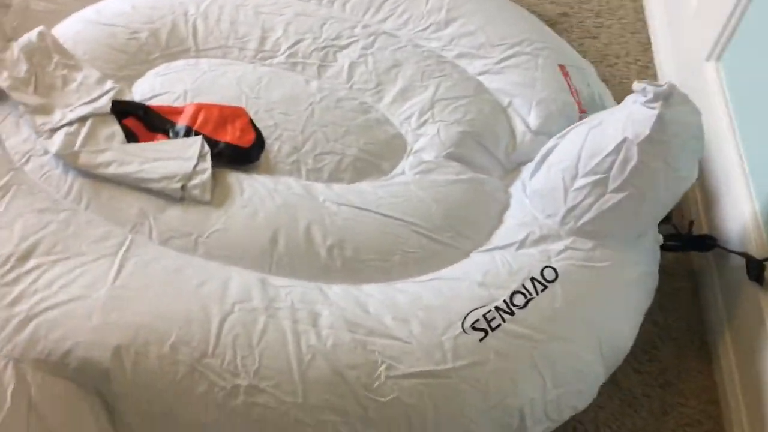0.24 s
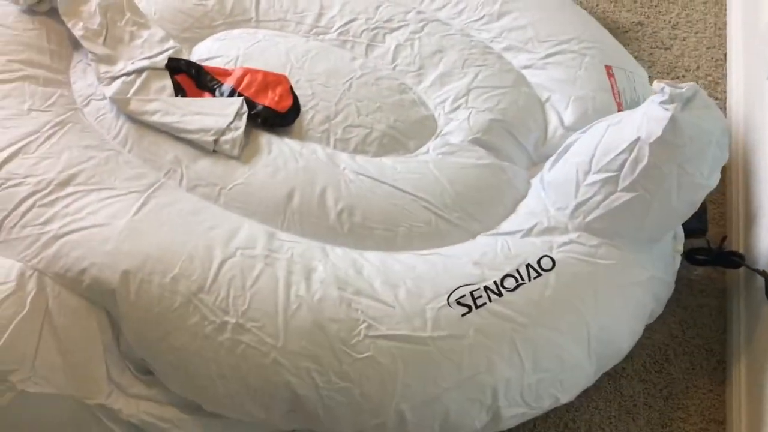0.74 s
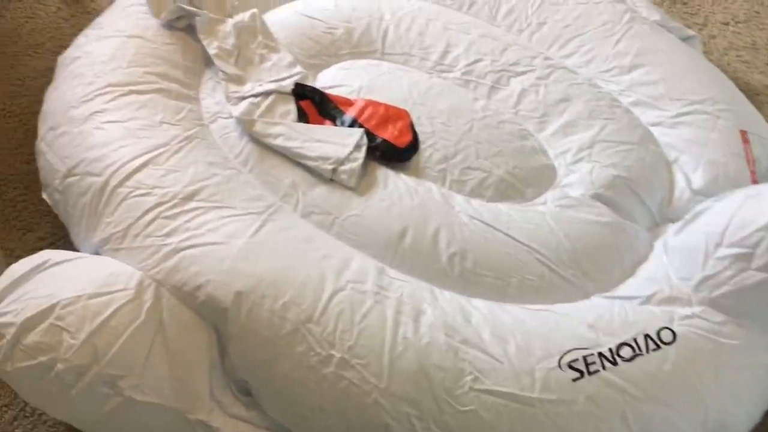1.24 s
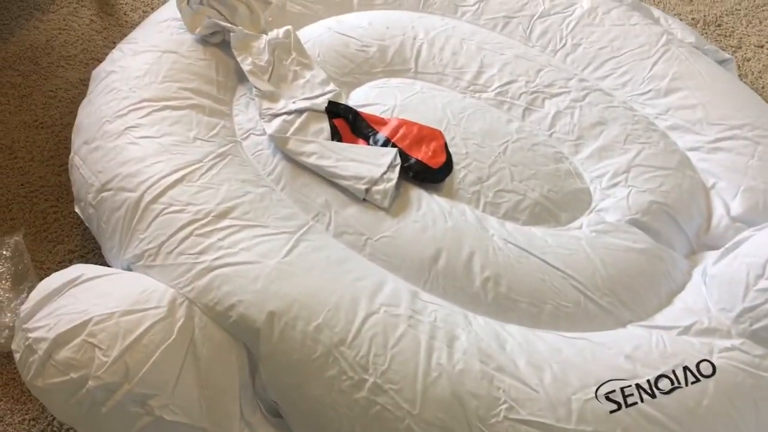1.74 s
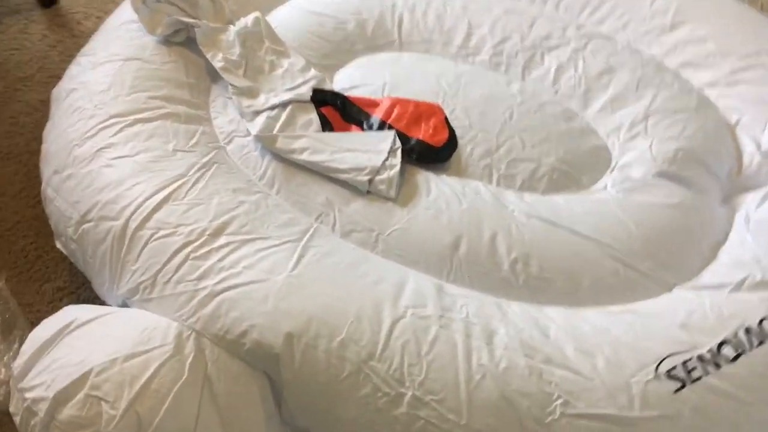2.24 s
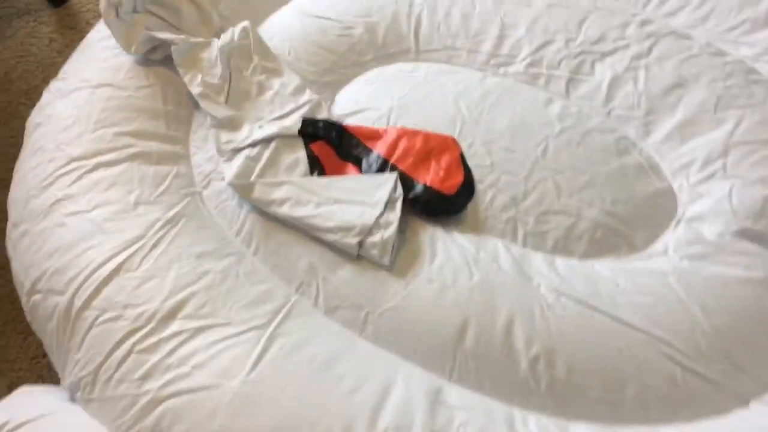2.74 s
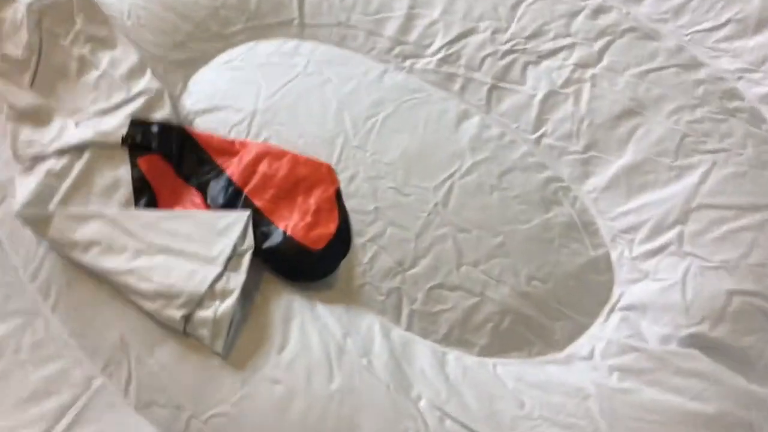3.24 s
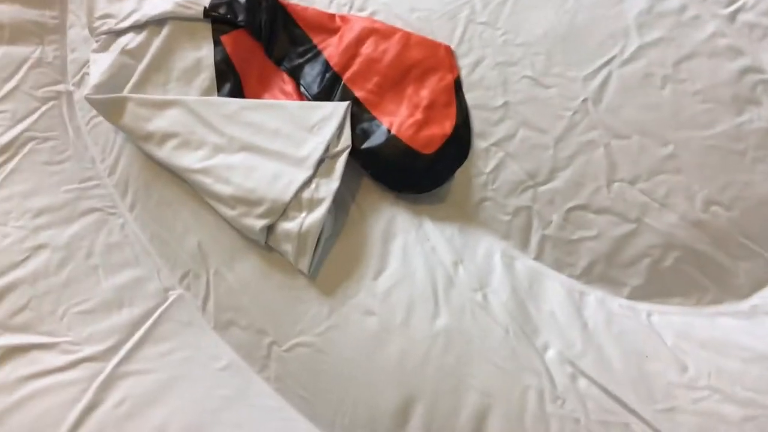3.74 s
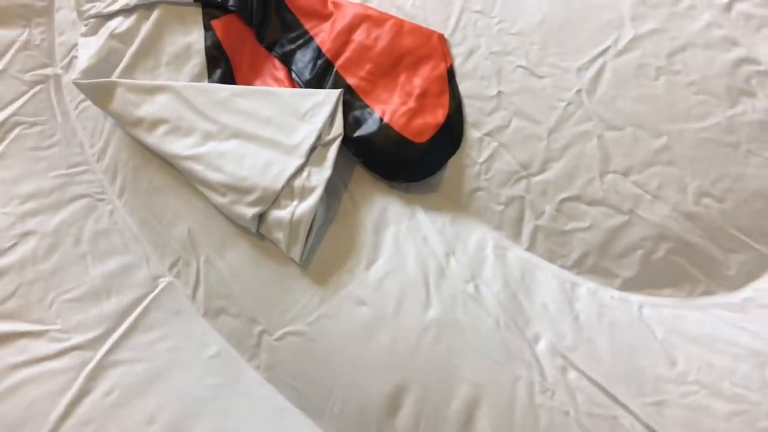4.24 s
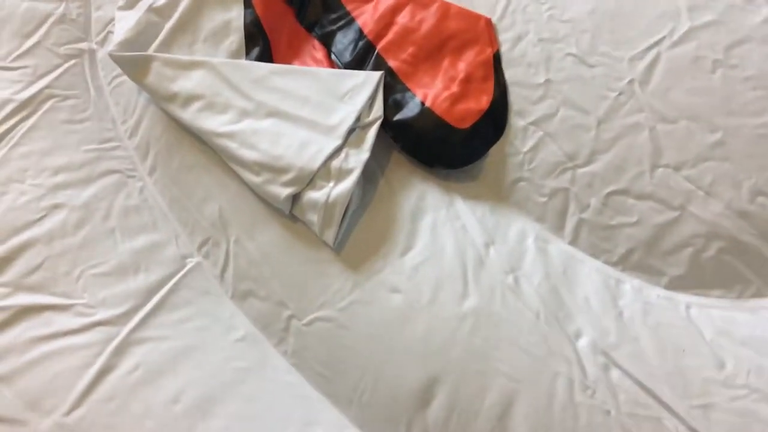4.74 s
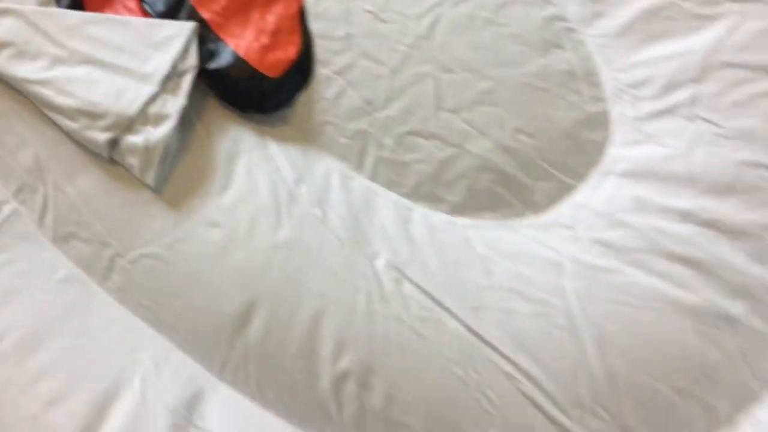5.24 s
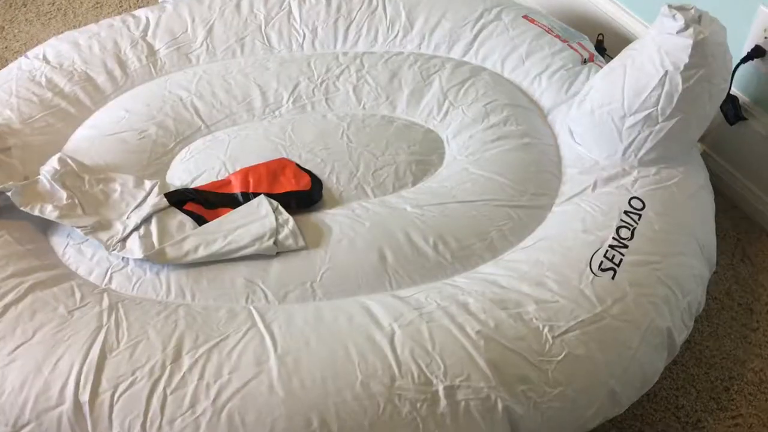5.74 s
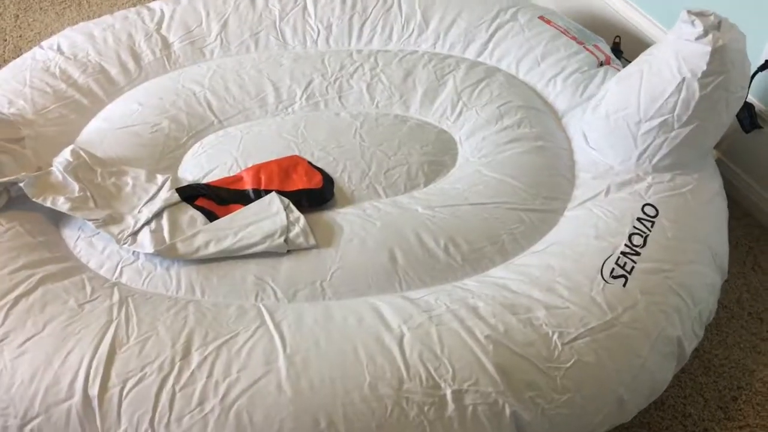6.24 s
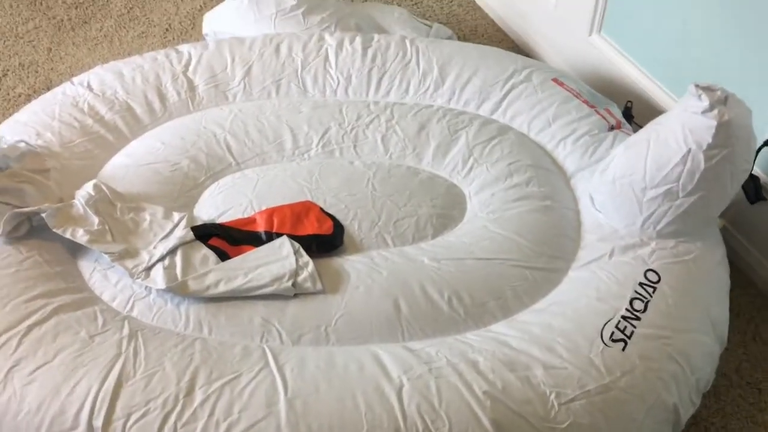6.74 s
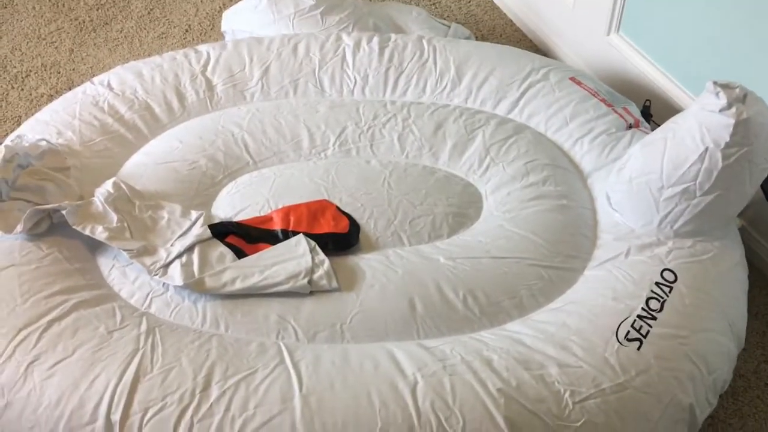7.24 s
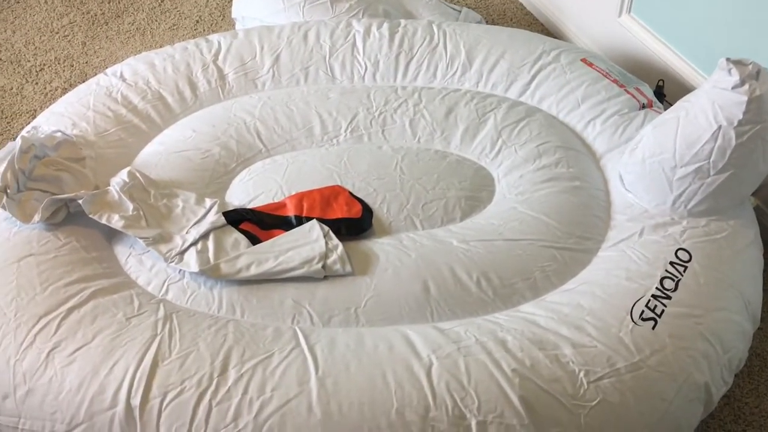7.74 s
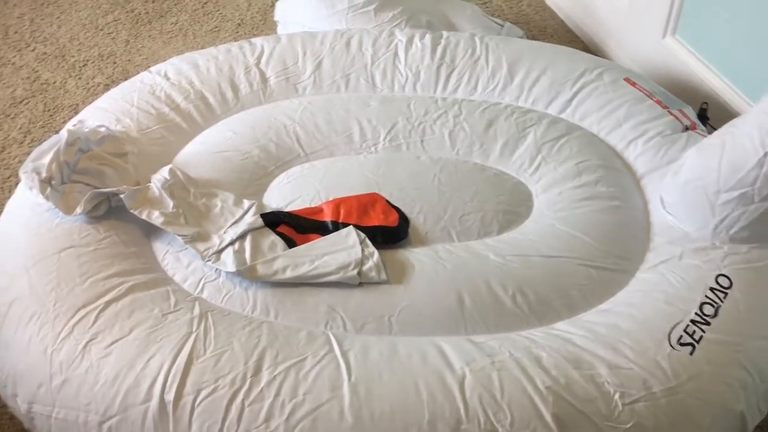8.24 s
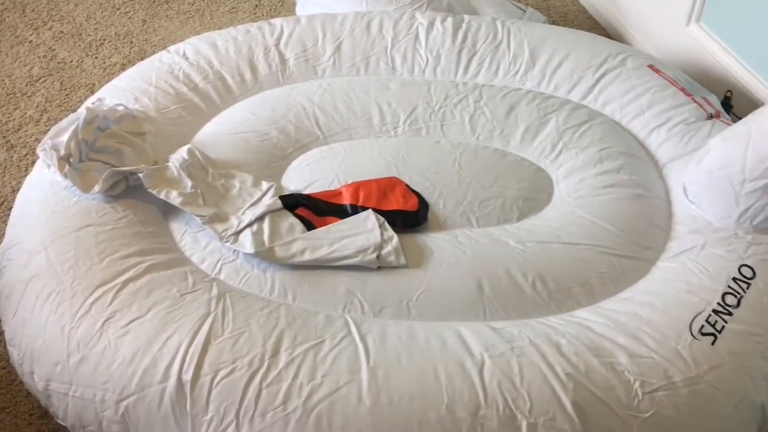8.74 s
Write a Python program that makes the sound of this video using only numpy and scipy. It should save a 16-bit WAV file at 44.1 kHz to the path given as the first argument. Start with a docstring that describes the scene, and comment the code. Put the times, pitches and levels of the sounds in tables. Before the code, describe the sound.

A small electric air pump fills a large vinyl pool float in a carpeted room, with a high motor whine over rushing, hissing air. The motor slowly drops in pitch under load and the vinyl gives a few faint thumps. About halfway, throttled air starts to howl in the nozzle. After a very brief dip in level, the pump runs on steadily, heard from further back with more electrical hum.

```python
"""Blowing up a pool float

A small electric blower fills a big vinyl float in a carpeted room. Its rotor whines over rushing, hissing air
and slows under load; the vinyl thumps softly as folds give way, and from 4.1 s throttled air howls in the
nozzle. At 5.55 s the sound dips briefly and goes on steadily, hollower, with more mains hum."""
import sys
import numpy as np
from scipy import signal
from scipy.fft import rfft, irfft, next_fast_len
from scipy.io import wavfile

SR = 44100
rng = np.random.default_rng(int(sys.argv[2]) if len(sys.argv) > 2 else 0)


def output_pcm(signal):
    """Save a mono or channel-first signal as 16-bit PCM at the path in sys.argv[1].

    Samples are clipped to [-1, 1] before scaling.
    """
    pcm = np.clip(np.atleast_2d(signal).T, -1, 1) * 32767
    wavfile.write(sys.argv[1], SR, np.round(pcm).astype(np.int16))


N = 396454
TIME = np.arange(N) / SR
FFT_SIZE = next_fast_len(N)
FREQ = np.maximum(np.arange(FFT_SIZE // 2 + 1) * SR / FFT_SIZE, 1)
STEP_S = 5.546  # from here on the blower sounds steadier and hollower

# rotor speed, sinking under load: (time [s], speed [turns/s])
ROTOR_SPEED = [(0.0, 238.6), (0.9, 238.9), (1.62, 237.67), (1.9, 235.0), (2.2, 233.5), (2.75, 226.83),
               (3.0, 225.93), (3.4, 223.27), (3.95, 221.2), (4.42, 213.5), (4.63, 212.67), (4.72, 205.33),
               (4.85, 201.0), (5.15, 197.5), (5.53, 197.83), (5.56, 207.4), (8.99, 208.2)]
# how the float shades the blower from the listener: (time [s], gain [dB])
FLOAT_SHADE = [(0, -1), (2.0, 0), (2.6, -4.5), (3.7, -7.5), (4.15, -13.5), (4.75, -7), (5.5, -2.5)]


def undb(db):
    """Decibels to gain."""
    return 10 ** (np.asarray(db) / 20)


def curves(table):
    """One automation curve per column, straight between the times in the first column."""
    times, *columns = np.transpose(table)
    return [np.interp(TIME, times, column) for column in columns]


def eq(points):
    """Gain over frequency from (Hz, dB) points, falling 60 dB an octave beyond the ends."""
    hz, db = np.transpose(points)
    octaves_outside = np.maximum(np.log2(hz[0] / FREQ), 0) + np.maximum(np.log2(FREQ / hz[-1]), 0)
    return undb(np.interp(np.log(FREQ), np.log(hz), db) - 60 * octaves_outside)


def bells(resonances):
    """Gain over frequency of bell-shaped humps and dips."""
    return undb(sum(db * np.exp(-(2 * (FREQ - hz) / width) ** 2) for hz, width, db in resonances))


def noise(colour):
    """Noise of rms 1, coloured by a gain over frequency."""
    x = irfft(rfft(rng.standard_normal(FFT_SIZE)) * colour, FFT_SIZE)[:N]
    return x / x.std()


def drift(rate):
    """Smooth random movement of spread 1 that changes about rate times a second."""
    size = 8192
    hz = np.arange(size // 2 + 1) * SR / N
    x = irfft(rfft(rng.standard_normal(size)) * np.exp(-(hz / rate) ** 2))
    return np.interp(np.arange(N) * size / N, np.arange(size), x / x.std())


def tone(phase, flutter, rate):
    """A partial of rms 1 whose level and phase flutter in the turbulent air."""
    carrier = (1 + flutter * drift(rate)) * np.sin(phase)
    jitter = flutter * drift(rate) * np.cos(phase)
    return np.sqrt(2 / (1 + 2 * flutter ** 2)) * (carrier + jitter)


def crossfade(before, after, span_s):
    """One noise gives way to another at equal power."""
    share = np.interp(TIME, span_s, [0, 1])
    return np.sqrt(1 - share) * before + np.sqrt(share) * after


def before_after(early, late):
    """One value before the level dip at 5.55 s, another after it."""
    return np.where(TIME < STEP_S, early, late)


def load():
    """Back pressure, read from the rotor's speed: 0 running free, 1 labouring."""
    free_hz, labouring_hz = 239, 197
    speed_hz, = curves(ROTOR_SPEED)
    return np.clip((free_hz - speed_hz) / (free_hz - labouring_hz), 0, 1)


def reflections(x, echo_db, count=12):
    """Walls and vinyl return short echoes; their comb of peaks slides as the listener moves."""
    # the listener's way round the float: (time [s], path [m])
    stroll = [(0, 0), (1.5, 1.17), (2.4, 0.74), (3.8, 2), (5, 1.2), (5.54, 1.2), (5.55, 2.5), (8.99, 2)]
    path_m, = curves(stroll)
    gain, out = undb(echo_db) / np.sqrt(count), x
    for delay_s, slant in rng.uniform([.002, -1], [.025, 1], (count, 2)):
        travel_s = np.abs(slant * path_m) / 343
        lag = np.round((delay_s + travel_s) * SR).astype(int)
        out = out + np.sign(slant) * gain * x[np.arange(N) - lag]
    return out / out.std()


def rotor():
    """Whine, drone and buzz are locked to the turning shaft; load unsettles the whine."""
    # the whine, swelling and fading as the listener moves: (time [s], level [dB])
    whine_levels = [(0.05, -44), (0.13, -28.5), (0.4, -40), (0.82, -27), (1.08, -38), (1.85, -34),
                    (2.3, -40), (2.44, -28), (2.64, -37), (2.74, -23.5), (3.12, -26.5), (3.25, -33),
                    (3.95, -34.5), (4.35, -43), (4.68, -33.5), (4.87, -26), (4.92, -38), (5.38, -33.5),
                    (5.6, -42), (7.3, -45.5), (7.8, -38.5), (8.99, -46.5)]
    # the octave above the whine: (time [s], level [dB])
    octave_levels = [(0, -38.5), (.9, -43), (1.3, -48), (2.6, -45), (3.0, -36), (3.9, -41), (4.8, -37),
                     (5.5, -42), (5.6, -46), (7.7, -46), (8.99, -40)]
    whine_order, drone_order = 30, 3  # cycles per turn
    speed_hz, = curves(ROTOR_SPEED)
    whine_db, = curves(whine_levels)
    octave_db, = curves(octave_levels)
    shade_db, = curves(FLOAT_SHADE)
    angle = 2 * np.pi * np.cumsum(speed_hz * (1 + .0001 * drift(12))) / SR
    waver_db = before_after(1.53 + .7 * load(), 2)
    breakup = 0.17 + 0.28 * before_after(load(), 0)
    whine = undb(whine_db + waver_db * drift(8.8)) * tone(whine_order * angle, flutter=0.21, rate=33)
    octave_gain = undb(octave_db + 1.3 * waver_db * drift(11))
    octave = octave_gain * tone(2 * whine_order * angle, flutter=breakup, rate=60)
    drone = undb(before_after(-38 + shade_db, -48)) * tone(drone_order * angle, flutter=0.22, rate=48)
    return whine + octave + drone + buzz(angle, speed_hz)


def buzz(angle, speed_hz):
    """Weaker rotor partials slide through the housing's resonances and sink once the flow is choked."""
    # rotor partials: (order [cycles/turn], level at full speed [dB], level once slowed [dB])
    partials = [(6, -49, -50), (8, -49.5, -49), (9, -47, -53), (10, -58, -48.5), (11, -52, -47.5),
                (12, -49.5, -49), (13, -52.5, -53), (15, -50, -52), (16, -50, -53), (17, -53, -45.5),
                (18, -49, -73), (19, -48, -58), (21, -51, -54), (25, -57, -56), (29, -65, -58),
                (31, -55, -58), (33, -49, -55), (36, -51, -69)]
    # housing resonances: (centre [Hz], width [Hz], boost [dB])
    housing_modes = [(1336, 39, 4), (1432, 14, 5), (2000, 36, 12), (2380, 120, 8), (2720, 26, 4),
                     (2863, 8, 0), (3580, 36, 2.5), (3700, 60, 2), (3754, 54, -4), (3880, 35, 4),
                     (4010, 61, 11), (7740, 60, 6), (7860, 40, 4)]
    slowed = np.interp(TIME, [1.8, 3], [0, 1])
    choke_db = np.interp(TIME, [4, 4.4], [0, -6.5])
    housing, out = bells(housing_modes), np.zeros(N)
    for order, fast_db, slow_db in partials:
        level_db = fast_db + slowed * (slow_db - fast_db) + 1.8 * drift(2.5)
        resonance = np.interp(order * speed_hz, FREQ, housing)
        out += undb(level_db) * resonance * tone(order * angle, flutter=0.28, rate=6.9)
    return undb(choke_db) * out


def mains_hum():
    """The motor's iron hums at multiples of the mains."""
    # the two hum partials: (time [s], level at 240 Hz [dB], level at 480 Hz [dB])
    hum_levels = [(0, -76, -71), (.7, -64.5, -67), (5.52, -58.5, -60), (5.58, -54.5, -54),
                  (7.4, -54, -48.5), (8.99, -57.5, -59)]
    return sum(undb(db) * tone(2 * np.pi * hz * TIME, flutter=0.09, rate=0.67)
               for hz, db in zip((240, 480), curves(hum_levels)))


def fan_rush():
    """A hollow rush from the fan housing, partly shaded by the float before 5.55 s."""
    # colour of the rush, before and after 5.55 s: (frequency [Hz], gain [dB])
    early_eq = [(40, -50), (100, -21.5), (175, -20), (215, -24), (300, -11), (360, -13.5), (450, -8),
                (640, -4), (1150, -2.5), (1550, -2.5), (2050, -2), (2600, -5.5), (3000, -12.5), (4000, -17)]
    late_eq = [(40, -34), (100, -18.5), (160, -14.5), (230, -12.5), (300, -6), (450, -7.5), (640, -2),
               (900, 0), (1250, -2.5), (1550, -2.5), (1750, -4), (2100, -33)]
    # its hollow resonances, before and after 5.55 s: (centre [Hz], width [Hz], boost [dB])
    early_hollows = [(398, 69, 1.5), (517, 42, -6), (614, 31, 1.5), (762, 50, 5), (863, 24, 5),
                     (1085, 19, 5.5), (1130, 37, -0.5), (1624, 49, -7), (1740, 39, 5), (1760, 43, 3)]
    late_hollows = [(267, 30, -5), (343, 55, 6), (429, 55, 8.5), (513, 32, -0.5), (640, 37, 6.5),
                    (760, 80, 7.5), (827, 30, -5), (861, 13.6, 9.5), (930, 27, -7), (953, 31, 8),
                    (1053, 37, 9), (1142, 42, 8), (1220, 29, 5), (1320, 29, 3.5), (1497, 140, 9)]
    shade_db, = curves(FLOAT_SHADE)
    early_db = -34 + 0.36 * shade_db  # only part of the shade: the rush also comes round by the walls
    early = undb(early_db) * reflections(noise(eq(early_eq) * bells(early_hollows)), echo_db=-8.5)
    late = undb(-36) * noise(eq(late_eq) * bells(late_hollows))
    return undb(0.76 * drift(14)) * before_after(early, late)


def valve_hiss():
    """Hiss and a fine spray grow with the back pressure; a thin jet swells and fades on its own."""
    # colours of the free hiss, loaded hiss, jet and spray: (frequency [Hz], gain [dB])
    free_eq = [(2800, -9), (3500, -5.5), (4000, -0.5), (4500, 4.5), (5400, -3.5), (6400, 1.5), (7800, -2.5),
               (9000, -6.5), (9800, -7), (11000, -5)]
    loaded_eq = [(2000, -1.5), (3500, -1.5), (4400, 2), (5400, -4.5), (6300, 0.5), (7400, 3.5),
                 (8600, -1.5), (9300, -2.5), (9800, -7), (11000, -18)]
    jet_eq = [(9500, -27), (10300, -0.5), (11100, 2), (11800, 3), (12600, -4), (13500, -22)]
    spray_eq = [(11800, -22), (12700, 3), (13700, 1), (14700, 1), (15700, -7)]
    # the jet before 5.55 s: (time [s], level [dB])
    jet_levels = [(0, -43), (1.7, -42.5), (2.15, -36), (2.45, -41), (2.8, -33), (3.2, -31.5), (3.5, -39.5),
                  (4.6, -34.5), (5.5, -36.5)]
    pressure = load()
    early_jet_db, = curves(jet_levels)
    jet_rise_db = early_jet_db - early_jet_db[0]
    hiss_db = before_after(np.interp(pressure, [0, .22], [-33.5, -30]), -32)
    jet_db = before_after(early_jet_db, -39.5)
    spray_db = before_after(-44.5 + 6 * pressure + 0.47 * jet_rise_db, -39.5)
    flow = crossfade(noise(eq(free_eq)), noise(eq(loaded_eq)), span_s=[2.8, 4.4])
    hiss = undb(hiss_db) * reflections(flow, echo_db=-4)
    jet = undb(jet_db + .5 * drift(21)) * reflections(noise(eq(jet_eq)), echo_db=-11)
    spray = undb(spray_db + 0.54 * drift(10)) * reflections(noise(eq(spray_eq)), echo_db=-4)
    eddies = undb(0.6 * drift(29))
    return eddies * (hiss + jet + spray)


def low_rumble():
    """A faint low rumble, swelling with handling noise while close to the float."""
    level_db = before_after(-71 + 5.5 * load(), -70)
    return undb(level_db + 1.3 * drift(5)) * noise(eq([(25, -31), (60, -13), (95, 1), (130, -2.5)]))


def low_tone():
    """A faint low tone slides down and fades; later it returns at a nearly steady pitch."""
    # its entries: (start [s], length [s], pitch [Hz], glide [Hz/s], level [dB])
    entries = [(.26, 0.35, 151, -48, -57), (.58, .4, 133, -10, -67), (3.05, 1.5, 173, -1, -66.5)]
    fade_s = 0.046
    out = np.zeros(N)
    for start, length, hz, glide, db in entries:
        age = np.clip(TIME - start, 0, length)
        fade = np.minimum(np.minimum(age, length - age) / fade_s, 1)
        phase = 2 * np.pi * (hz + glide * age / 2) * age
        out += undb(db) * fade * tone(phase, flutter=.15, rate=15)
    return out


def vinyl_thumps():
    """Folds give way: a short dull slap, then the air-filled skin booms."""
    # thumps: (time [s], relative level [dB], pitch [Hz], 60 dB decay [s], slap against boom [dB])
    thumps = [(1.435, -43, 165.1, 0.14, -12), (2.369, -52, 140, 0.12, 4), (4.729, -44, 171, 0.16, 5.5),
              (4.845, -47, 153, 0.12, 5), (5.116, -44.5, 175, 0.15, 6.5), (5.164, -40, 164, .15, -8),
              (5.21, -46, 140, .13, -3), (8.425, -42, 97, 0.23, -25)]
    slap_noise = noise(eq([(150, -4), (300, -4), (550, 5), (900, -28)]))
    out = np.zeros(N)
    for start, db, hz, t60, slap_db in thumps:
        age = np.maximum(TIME - start, 0)
        boom_envelope = np.exp(-np.log(1000) * age / t60) * (1 - np.exp(-age / 0.01))
        boom = boom_envelope * np.sin(2 * np.pi * hz * age)
        slap = slap_noise * np.exp(-age / 0.025) * (1 - np.exp(-age / 0.0013))
        out += undb(db) * (boom + undb(slap_db) * slap)
    return undb(5) * out


def valve_spurts():
    """The gap at the valve shifts, and each time the air swells briefly in one resonance."""
    # spurts of air: (peak time [s], length [s], centre [Hz], width [Hz], level [dB])
    spurts = [(2.68, 0.36, 4637, 1010, -34.5), (3.122, 0.72, 1260, 350, -44.5),
              (4.225, 0.19, 2600, 350, -27), (4.355, .25, 14200, 2000, -33), (4.378, 0.07, 2350, 130, -26),
              (4.66, 0.05, 5500, 6050, -25.5), (4.94, 0.088, 860, 70, -42), (5.123, .14, 3000, 700, -34),
              (5.33, .4, 9050, 1200, -38), (5.42, .18, 3330, 600, -36)]
    gap = eq([(600, 0), (16000, 0)])
    out = np.zeros(N)
    for peak_s, length, hz, width, db in spurts:
        swell = np.exp(-(2 * (TIME - peak_s) / length) ** 2)
        resonance = np.exp(-2 * ((FREQ - hz) / width) ** 2)
        out += undb(db) * swell * noise(gap * resonance)
    return out


def nozzle_ring(modes):
    """Turbulent air rings the nozzle's resonances; so small a mouth radiates no bass."""
    mouth = eq([(120, 1), (250, 1), (8000, -2)])
    power = sum(undb(db) ** 2 / (1 + ((FREQ - hz) / width) ** 2) ** 2 for hz, width, db in modes)
    return noise(mouth * np.sqrt(power))


def nozzle_howl():
    """Throttled air builds to a howl, catches and sags: pinched, wide after a spurt, then settled."""
    # nozzle resonances in each state: (centre [Hz], half width [Hz], level [dB])
    pinched_modes = [(527, 174, -18), (1946, 54, 0), (2170, 56, -4.5), (2398, 23, 4), (2640, 140, -4),
                     (2900, 440, -11.5)]
    wide_modes = [(2070, 120, -2), (2240, 100, 1), (2540, 280, 3), (3120, 370, 0), (3520, 220, -5)]
    settled_modes = [(1870, 280, -19.5), (1921, 70, -3.5), (2153, 19, -5), (2267, 46, -6), (2313, 14.4, 1),
                     (2477, 68, -7.5), (2552, 18, -0.5), (2650, 100, -8), (2680, 47, -3.5),
                     (2680, 25.0, -14), (2876, 48, -5.5), (3090, 113, -8), (3360, 95, -16.5),
                     (3520.0, 180, -28)]
    catch_s, attack_s, sag_s = 4.06, 0.16, 0.51
    age = TIME - catch_s
    caught = np.clip(age / attack_s, 0, 1)
    lead_in_db = -7 + 15 * np.minimum(age, 0)  # a faint ring grows before the howl catches
    overshoot_db = 7 * np.exp(-np.maximum(age - attack_s, 0) / sag_s)
    level_db = before_after(-32 + (1 - caught) * lead_in_db + caught * overshoot_db, -27.5)
    early = crossfade(nozzle_ring(pinched_modes), nozzle_ring(wide_modes), span_s=[4.62, 4.72])
    late = nozzle_ring(settled_modes)
    return undb(level_db + 0.86 * drift(25)) * before_after(early, late)


def scene():
    """All sources, the same in both channels."""
    bed = rotor() + mains_hum() + fan_rush() + valve_hiss() + low_rumble()
    mono = bed + low_tone() + vinyl_thumps() + valve_spurts() + nozzle_howl()
    return np.array([mono, mono])


def record(dry):
    """The level dips briefly once, and the highest treble is cut."""
    fade_s, floor_gain, cutoff_hz = 0.032, .06, 15750
    dip = np.clip(np.abs(TIME - STEP_S) / fade_s, floor_gain, 1)
    lowpass = signal.ellip(10, .2, 80, cutoff_hz, fs=SR, output="sos")
    return signal.sosfilt(lowpass, dry * dip)


dry = scene()
out = record(dry)
output_pcm(out)
```